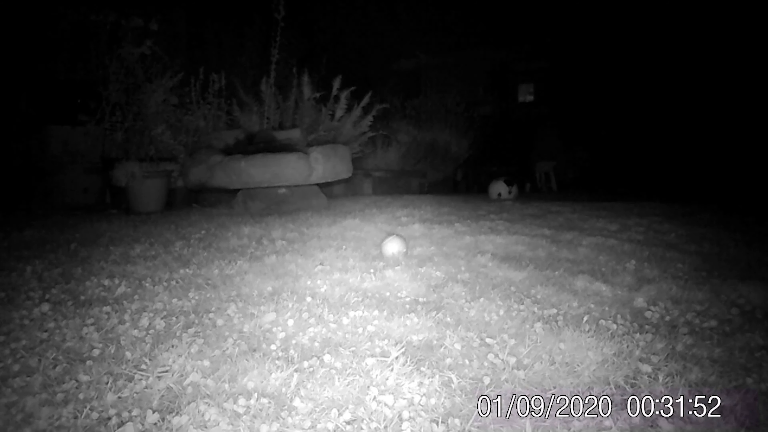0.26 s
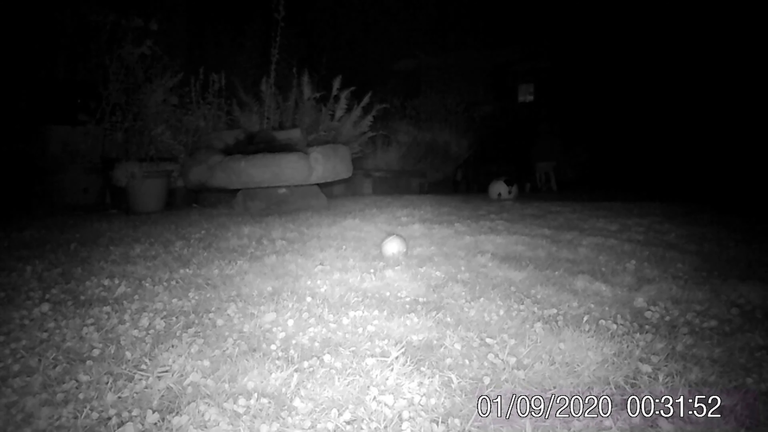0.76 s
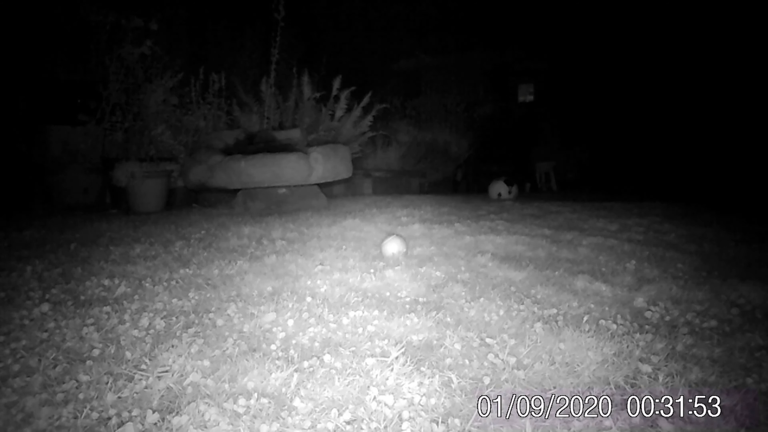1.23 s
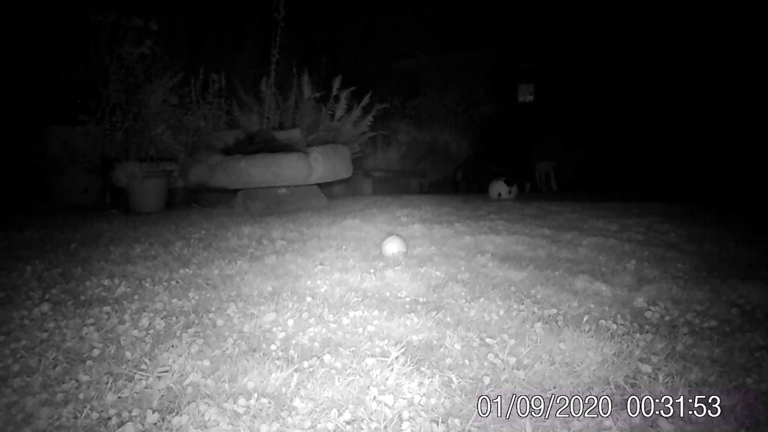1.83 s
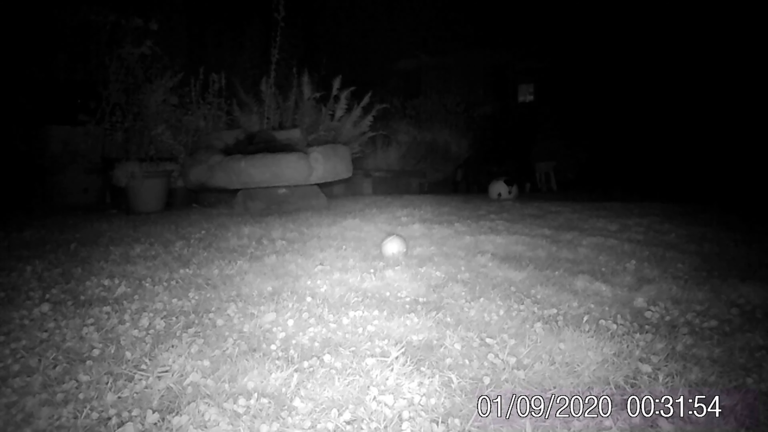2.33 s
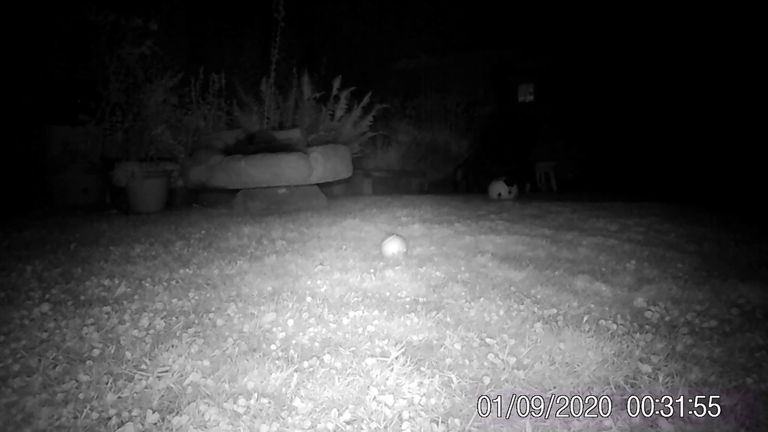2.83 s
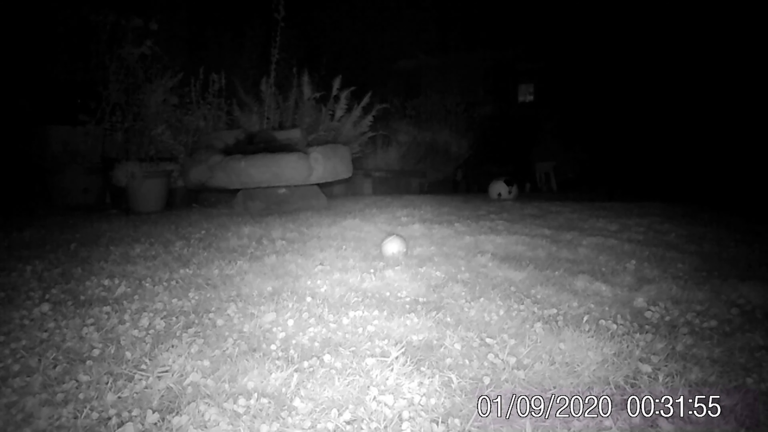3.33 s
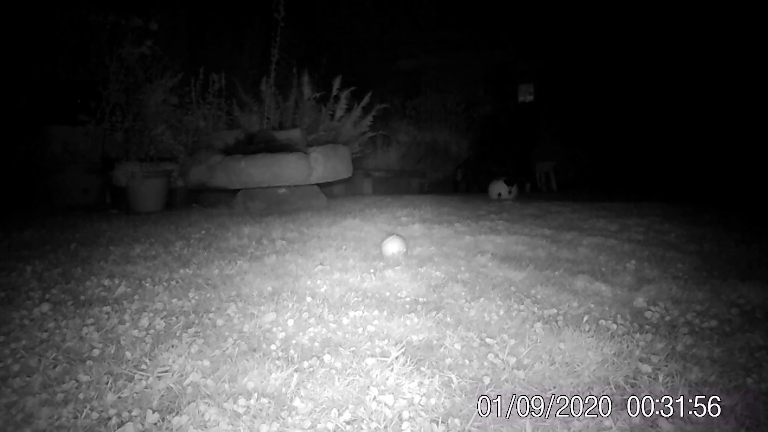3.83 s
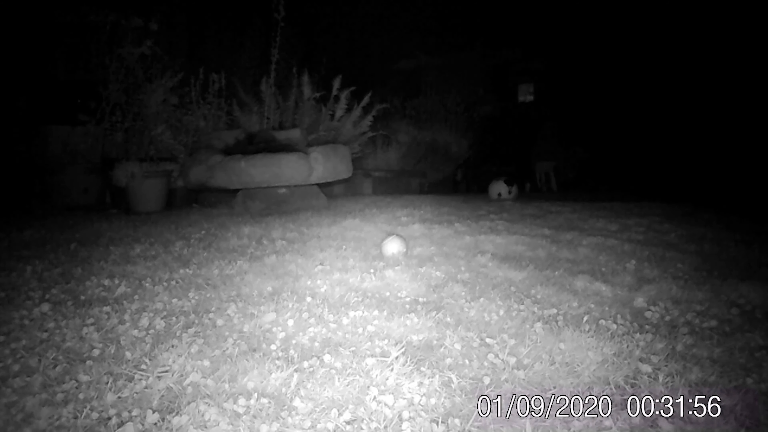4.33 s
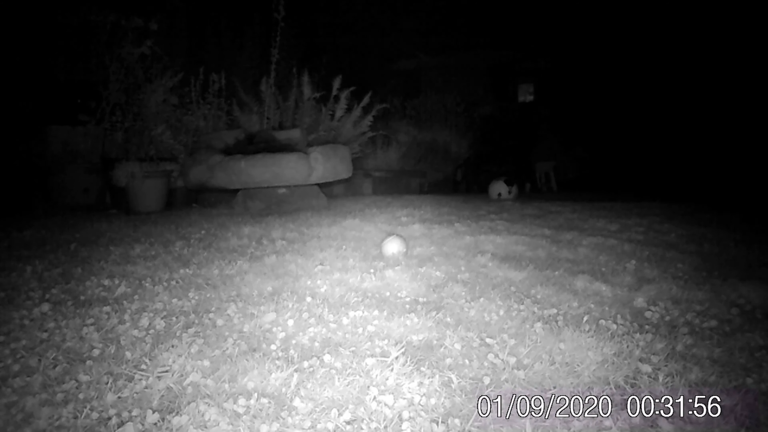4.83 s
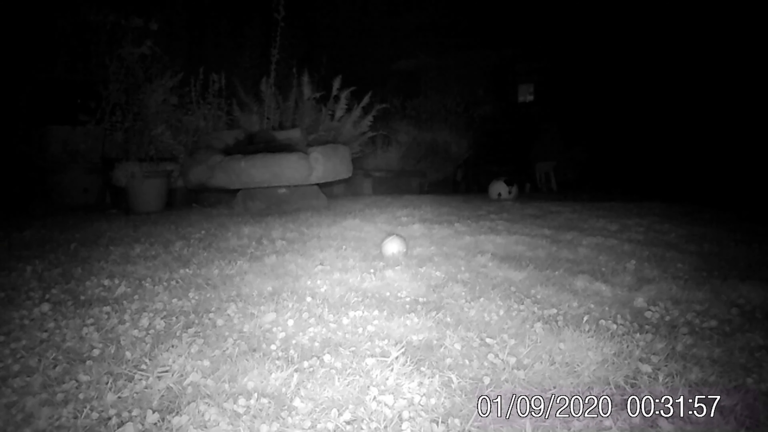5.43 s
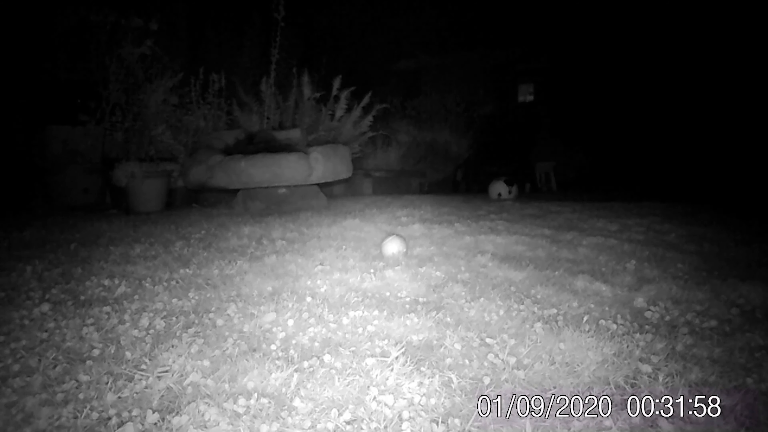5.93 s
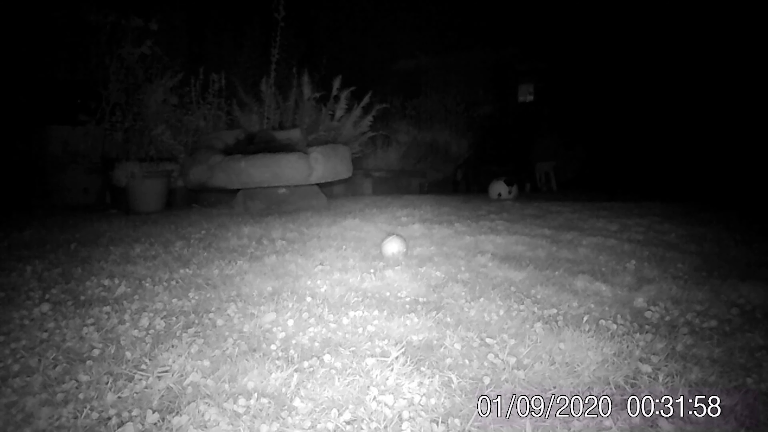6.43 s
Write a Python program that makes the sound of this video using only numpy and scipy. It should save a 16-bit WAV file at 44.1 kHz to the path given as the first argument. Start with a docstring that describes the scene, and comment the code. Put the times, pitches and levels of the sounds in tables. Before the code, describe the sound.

Raccoons shuffle over a gravel yard at night, pebbles clicking and crunching lightly under their paws throughout. About two seconds in, one gives a loud, rapid trill that strains into squeaks. Near the end come two shorter, softer, lower trills. The small outdoor microphone sounds narrow and dull, with steady hiss, electrical hum and a faint thin whine over a distant low rumble.

```python
"""Raccoons chittering in a gravel yard at night

One loud trill strains into squeaks; two softer, lower trills follow, with milder overtones and hardly
any squeak. Each is a run of arched chirps about 20 ms long, some 23 a second. Pebbles click under paws.
A narrow-band trail camera hears it all over a far rumble and adds hiss, mains hum and a thin whine."""
import sys
import numpy as np
from scipy import signal
from scipy.fft import rfft, irfft
from scipy.io import wavfile

SR = 44100
rng = np.random.default_rng(int(sys.argv[2]) if len(sys.argv) > 2 else 0)


def digitize_waveform(pressure):
    """Quantize a signal to 16-bit integers and store it at the path in sys.argv[1].

    Rows of a 2-D input are taken as channels; values are limited to [-1, 1].
    """
    field = np.atleast_2d(pressure).T
    bounded = np.clip(field, -1, 1)
    quanta = np.round(bounded * 32767).astype(np.int16)
    wavfile.write(sys.argv[1], SR, quanta)


N = 294147
TIME = np.arange(N) / SR

# how busily the paws stir the gravel: (time [s], base grain rate [1/s])
PAW_ACTIVITY = [(0, 284), (1.3, 384), (2.9, 198), (4.1, 154), (4.7, 370), (5.4, 220), (6.5, 390)]


def from_db(db):
    """Decibels to gain."""
    return 10 ** (np.asarray(db) / 20)


def unit_rms(x):
    """Scale to rms 1."""
    return x / np.sqrt(np.mean(x ** 2) + 1e-20)


def automation(points):
    """A curve through (time, value) points, sample by sample."""
    return np.interp(TIME, *np.transpose(points))


def mix_in(out, start_s, sound):
    """Lay a sound onto the track."""
    at = int(np.clip(round(start_s * SR), 0, N - 1))
    out[at:at + len(sound)] += sound[:N - at]


def coloured_noise(spectrum):
    """Steady noise at rms 1, shaped by (frequency [Hz], level [dB]) points."""
    hz, db = np.transpose(spectrum)
    bin_hz = np.maximum(np.arange(N // 2 + 1) * SR / N, 1)
    eq = from_db(np.interp(np.log(bin_hz), np.log(hz), db))
    return unit_rms(irfft(rfft(rng.standard_normal(N)) * eq, N))


def drift(rate_hz):
    """Smooth random motion at rms 1."""
    lowpass = signal.butter(2, rate_hz, fs=SR, output="sos")
    return unit_rms(signal.sosfilt(lowpass, rng.standard_normal(N + SR))[SR:])


def ring(x, hz, t60):
    """One resonant mode: a unit click rings with height 1."""
    radius = from_db(-60 / (max(t60, .001) * SR))
    angle = 2 * np.pi * hz / SR
    return signal.lfilter([0, np.sin(angle)], [1, -2 * radius * np.cos(angle), radius ** 2], x + 1e-18)


def tones(partials):
    """Steady sines with random phases."""
    return sum(np.sqrt(2) * from_db(db) * np.sin(2 * np.pi * (hz * TIME + rng.random()))
               for hz, db in partials)


def far_rumble(gain_db=1.5):
    """A low bed of distant noise that slowly swells and sinks."""
    # level ride: (time [s], level before the gain [dB])
    swells = [(0, -42), (1.1, -41), (1.9, -38), (2.35, -35.5), (4.2, -37.5), (4.8, -38), (5.8, -41),
              (6.35, -36.5)]
    # rumble colour: (frequency [Hz], relative level [dB])
    colour = [(20, -44), (35, -22), (55, 1), (100, -0.5), (135, -4), (200, -1.5), (240, -5.5), (290, -15),
              (500, -35.5)]
    return from_db(automation(swells) + gain_db) * coloured_noise(colour)


def microphone_hiss(level_db=-34.0):
    """The microphone's steady, dull noise floor."""
    # hiss colour: (frequency [Hz], relative level [dB])
    colour = [(30, 7), (200, .5), (400, 3), (750, 3), (1200, 0.8), (2000, -1.5), (2800, -2.5), (3500, -3),
              (4100, -9), (6000, -23)]
    return from_db(level_db) * coloured_noise(colour)


def mains_hum():
    """Odd harmonics of the 60 Hz mains."""
    # hum partials: (frequency [Hz], rms level [dB])
    partials = [(60, -39.5), (180, -45.5), (300, -56.5), (540, -42.5), (900, -51.5)]
    return tones(partials)


def circuit_noise(hiss_db=-59.0):
    """The camera's circuits give off a faint, bright hiss and a thin whine."""
    # hiss colour: (frequency [Hz], relative level [dB])
    colour = [(3000, 9.5), (5000, -3.5), (6000, 0), (7500, -3.5), (10700, -1.5), (11400, 1.5), (12500, 8),
              (13200, -8), (16000, -2)]
    # whine partials: (frequency [Hz], rms level [dB])
    whine = [(4500, -77), (6000, -85), (7500, -79), (9000, -73.5), (10500, -78.5), (12000, -63),
             (13500, -73.5), (15000, -77.5)]
    return from_db(hiss_db) * coloured_noise(colour) + tones(whine)


def gravel_shuffle(softest_db=-35.0, spread_db=5.0, clump_db=4, ring_cycles=22, pitch_count=18):
    """Small stones shift in clumps: dry grains, each ringing briefly at one pitch."""
    clumps = from_db(clump_db * np.minimum(drift(30), 1.5))
    hits = rng.random(N) < automation(PAW_ACTIVITY) * clumps / SR
    strength = from_db(softest_db + spread_db * np.minimum(rng.exponential(1, N), 2))
    clicks = hits * strength * rng.choice([-1, 1], N)
    stone = rng.integers(0, pitch_count, N)
    pitches = np.linspace(1250, 3400, pitch_count)
    return sum(ring(clicks * (stone == k), hz, ring_cycles / hz) for k, hz in enumerate(pitches))


def faint_knocks(per_grain=.03, mean_db=-24, spread_db=1.6, crunch_db=-2.5, low_hz=1293, high_hz=2900):
    """Chance hits for pebble_knocks: the busier the paws, the more often they come."""
    knocks_due = np.cumsum(automation(PAW_ACTIVITY)) * per_grain / SR
    moment, strength, smallness = rng.random((int(knocks_due[-1]), 3)).T
    times = np.interp(np.arange(len(moment)) + moment, knocks_due, TIME)
    levels = mean_db + spread_db * (2 * strength - 1)
    pitches = low_hz * (high_hz / low_hz) ** smallness
    return [(*knock, crunch_db) for knock in zip(times, levels, pitches)]


def pebble_knocks(gain_db=2.5, ring_t60=0.034, crunch_s=0.0072, rock_s=0.003495):
    """A pebble rocks against its neighbours for a few milliseconds: a gritty crunch and a short ring."""
    # the loudest hits: (time [s], peak before the gain [dB], ring pitch [Hz], crunch against ring [dB])
    loud_knocks = [(.0566, -24, 2660, -8), (.358, -23.5, 1726, -5), (.3703, -21, 1934, -14),
                   (0.6198, -19, 1770, 1), (0.7049, -22, 1355, 8), (.7412, -20, 3150, 0),
                   (1.037, -20, 2060, 12), (1.063, -21, 1760, -4), (1.1497, -20.5, 1745, -6),
                   (1.4907, -22, 3340, -8), (1.5237, -19.5, 2805, -8), (1.7422, -20.5, 2230, -3),
                   (1.823, -23.5, 1531, 1), (3.6291, -23, 1616, -22), (3.681, -18.5, 1620, -4),
                   (3.741, -24.5, 2040, -3), (3.913, -20, 1740, 2), (4.0982, -21.5, 1570, 8),
                   (4.2267, -23, 1379, -3), (4.3028, -22, 1740, -6), (4.601, -19.5, 2050, -5),
                   (4.645, -23.5, 1633, -2), (4.7352, -22, 2110, 7), (4.9, -22, 2860, -8),
                   (5.0732, -21, 1390, -3), (5.1243, -23, 1660, -9), (5.185, -17, 1594, -8),
                   (5.541, -20.5, 1760, -6), (6.2306, -20.5, 1650, -1), (6.3154, -26, 2740, -11),
                   (6.4918, -23, 2320, -1)]
    out, t = np.zeros(N), TIME[:SR // 10]
    attack = 1 - np.exp(-2 * t / rock_s)
    for time_s, db, hz, crunch_db in loud_knocks + faint_knocks():
        band = signal.butter(2, [.7 * hz, min(1.7 * hz, 4500)], "band", fs=SR, output="sos")
        crunch = signal.sosfilt(band, rng.standard_normal(len(t))) * np.exp(-t / crunch_s)
        tone = np.sin(2 * np.pi * hz * t) * from_db(-60 * t / ring_t60)
        knock = (unit_rms(tone) + from_db(crunch_db) * unit_rms(crunch)) * attack
        mix_in(out, time_s - rock_s / 2, from_db(db + gain_db) * knock / np.abs(knock).max())
    return out


def voice_strain(time_s, level_db):
    """Levels [dB] of harmonics 1-5 and the squeak: strain brightens, a strong squeak pinches the tone."""
    # vocal effort, levels against the fundamental: (time [s], overtones [dB], closing squeak [dB])
    strain = [(2.01, -19, -8), (2.14, -9.5, -7), (2.18, 2, -7), (2.26, 8, 5.5), (2.335, 5, -4),
              (2.38, 2, 13), (2.49, -3.5, 1), (2.6, -2, 2), (2.67, -3, -6), (5.39, -9, -17)]
    # timbre, harmonics 2 to 5: (offset from the overtone level [dB])
    timbre = [-0.72, -0.15, -0.15, -2]
    # pinch around the third, harmonics 2 to 5: (loss per dB of squeak above the overtone level [dB/dB])
    pinch_loss = [0.7, 0, 0.34, 0.24]
    times, *curves = np.transpose(strain)
    overtone_db, squeak_db = [level_db + np.interp(time_s, times, curve) for curve in curves]
    pinch_db = max(squeak_db - overtone_db, 0)
    overtones = [overtone_db + db - loss * pinch_db for db, loss in zip(timbre, pinch_loss)]
    return [level_db] + overtones, squeak_db


def raccoon_chitter(voiced_share=.47, longest_s=.0255, rise=.21, fall=.28, hold=1.036,
                    swell_db=13, swell_at=0.053, flutter_db=2.5, jitter=0.012, closing_jitter=0.073,
                    mouth_hz=3000, mouth_width_hz=470, squeak_at=0.59, squeak_width=0.28, rasp_db=-16):
    """Each chirp arches up in pitch, then drops, turning rough and flaring in the mouth resonance."""
    # chirps at the top of their arch: (time [s], pitch [Hz], level of the fundamental [dB])
    chirps = [ (2.013, 860, -27), (2.059, 820, -22), (2.098, 842, -23.5), (2.142, 883, -23.5),
              (2.181, 974, -23), (2.218, 1018, -20.5), (2.259, 1002, -25), (2.299, 995, -31),
              (2.340, 1025, -24), (2.380, 1051, -24), (2.421, 1049, -22), (2.463, 1000, -22.5),
              (2.509, 1003, -21), (2.554, 1018, -22.5), (2.603, 967, -22.5), (2.665, 889, -23.5),
              (5.394, 794, -34), (5.439, 743, -35), (5.49, 752, -31), (5.539, 758, -28.5),
              (5.991, 783, -28.5), (6.031, 800, -28.5), (6.075, 806, -27.5), (6.136, 603.6, -29.5)]
    waits = np.diff([time_s for time_s, *_ in chirps], append=np.inf)
    lengths = np.minimum(voiced_share * waits, longest_s)   # chirps stretch as the trill slows
    out = np.zeros(N)
    wobble, flutter = drift(780), flutter_db * drift(265)
    rasp = coloured_noise([(300, -30), (900, -4), (2200, -18.5), (2900, 10), (4500, -3), (8000, -29)])
    for (time_s, top_hz, level_db), half_s in zip(chirps, lengths / 2):
        harmonic_db, squeak_db = voice_strain(time_s, level_db)
        span = np.arange(int((time_s - 1.5 * half_s) * SR), int((time_s + 1.5 * half_s) * SR))
        position = (TIME[span] - time_s) / half_s   # -1 at the opening, +1 at the close
        voiced = np.exp(-(position / hold) ** 8)
        squeak = np.exp(-((position - squeak_at) / squeak_width) ** 2)
        arch = np.exp(-np.where(position < 0, rise, fall) * position ** 2)
        pitch = top_hz * arch * (1 + (jitter + closing_jitter * squeak) * wobble[span])
        phase = 2 * np.pi * (np.cumsum(pitch) / SR + rng.random())
        for k, db in enumerate(harmonic_db, 1):
            mouth = 1 / (1 + ((k * pitch - mouth_hz) / mouth_width_hz) ** 2)
            # overtones come in later and leave sooner
            swell = from_db(-swell_db * (k > 1) * (position - swell_at) ** 2)
            envelope = from_db(db) * voiced * swell + from_db(squeak_db) * squeak * mouth
            envelope *= from_db(flutter[span - k * len(span)])   # each harmonic flutters on its own
            out[span] += envelope * np.sin(k * phase + 2 * np.pi * rng.random())
        out[span] += from_db(squeak_db + rasp_db) * squeak * rasp[span]
    return out


def yard_reverb(x, tail_db=-13, t60=0.055):
    """A few near echoes and a short scatter from plants and gravel."""
    # reflections off pots and walls: (delay [s], level [dB])
    echoes = [(.0065, -22), (0.013, -26.5), (0.025, -28)]
    t = TIME[:SR // 3]
    scatter = rng.standard_normal(len(t)) * from_db(-60 * t / t60)
    response = from_db(tail_db) * scatter / np.linalg.norm(scatter)
    for delay_s, db in echoes:
        response[int(delay_s * SR)] += from_db(db)
    return x + signal.fftconvolve(x, response)[:N]


def scene():
    """Voices and gravel in the yard, over a bed of rumble, hiss and hum, in mono."""
    raccoons = yard_reverb(raccoon_chitter() + pebble_knocks() + gravel_shuffle())
    return (raccoons + far_rumble() + microphone_hiss() + mains_hum())[None]


def record(dry, voice_band_hz=3968, cutoff_hz=15750):
    """The camera cuts everything above the voice band, then adds its own circuit noise."""
    voice_band = signal.butter(22, voice_band_hz, fs=SR, output="sos")
    top_cut = signal.ellip(12, .1, 80, cutoff_hz, fs=SR, output="sos")
    narrow = signal.sosfilt(voice_band, dry)
    return signal.sosfilt(top_cut, narrow + circuit_noise())


dry = scene()
out = record(dry)
digitize_waveform(out)
```